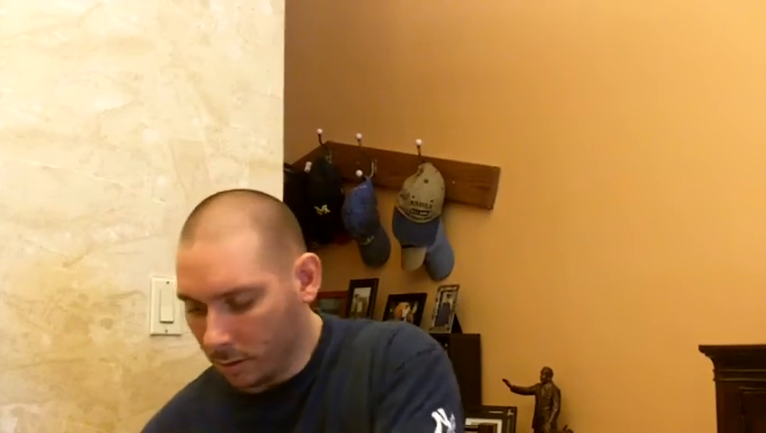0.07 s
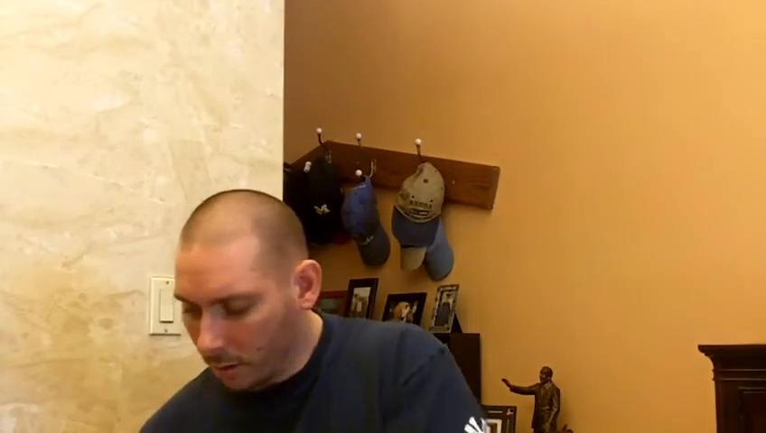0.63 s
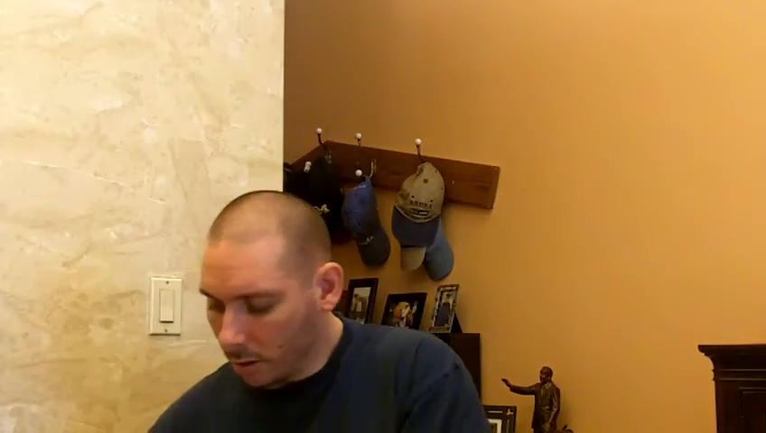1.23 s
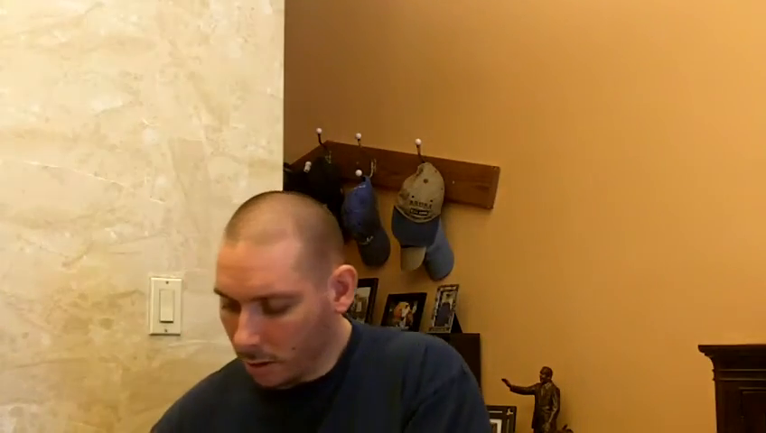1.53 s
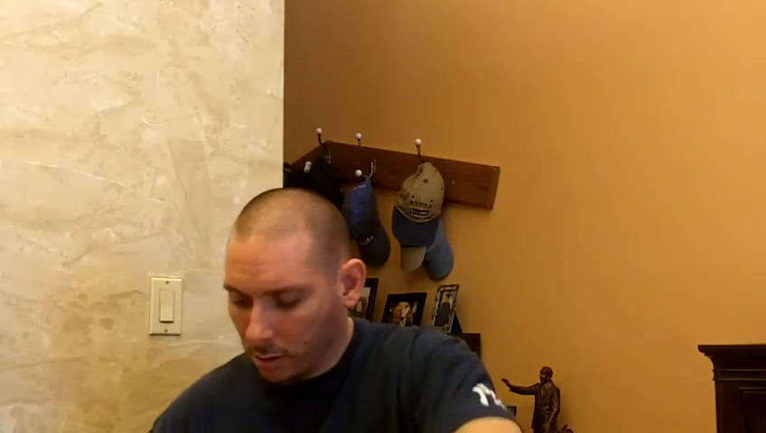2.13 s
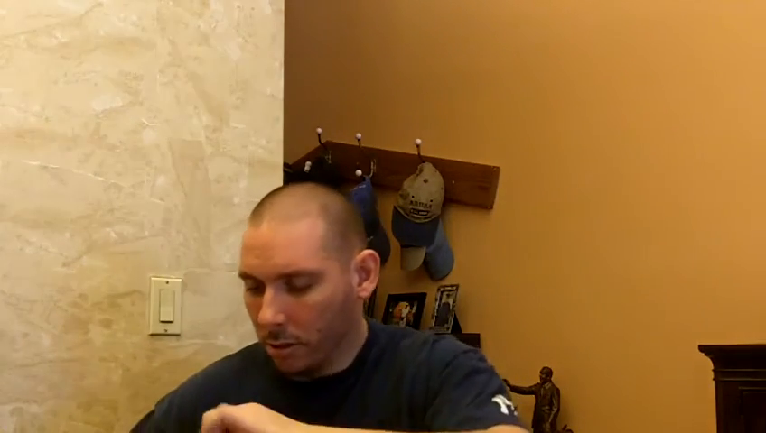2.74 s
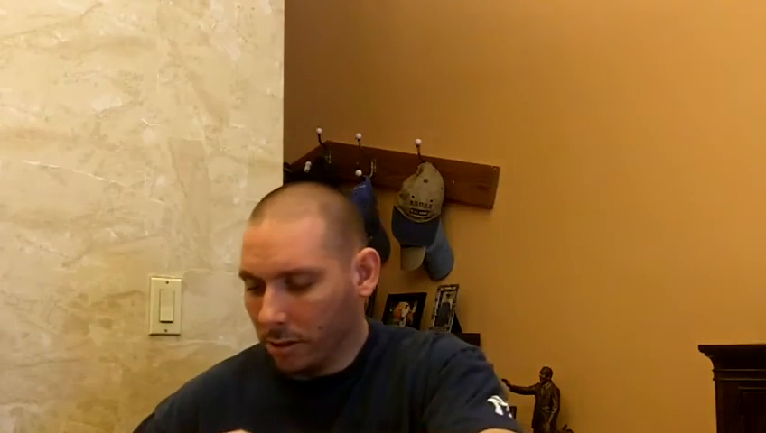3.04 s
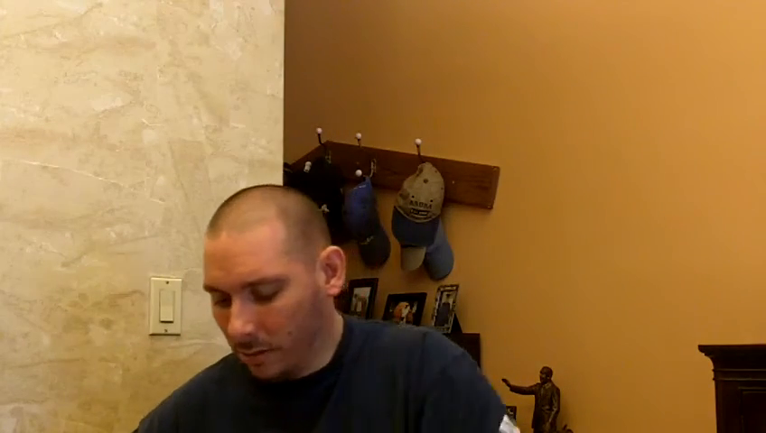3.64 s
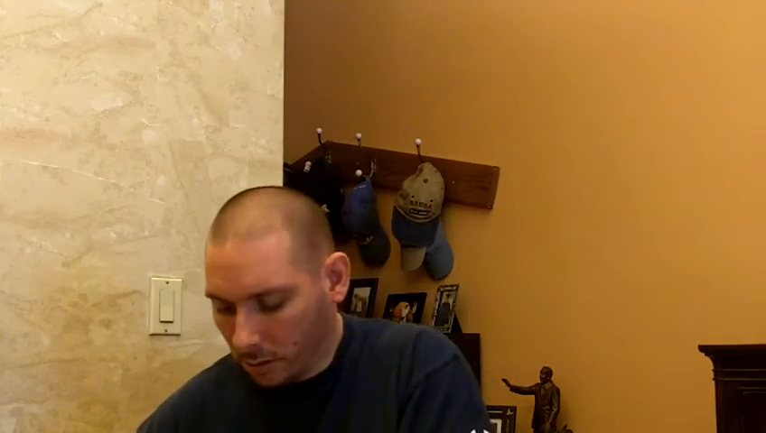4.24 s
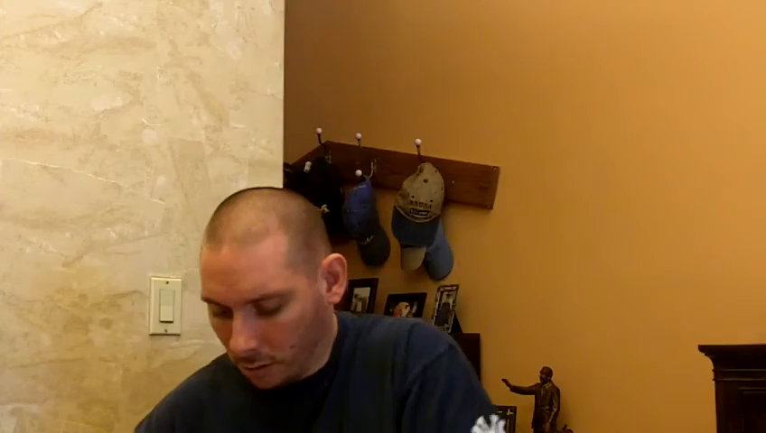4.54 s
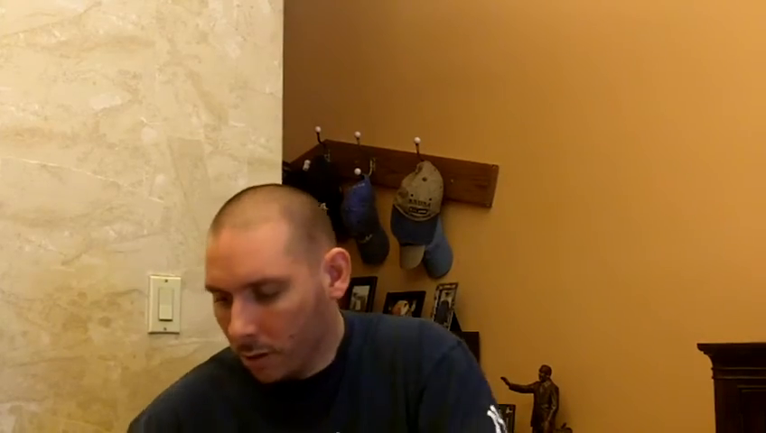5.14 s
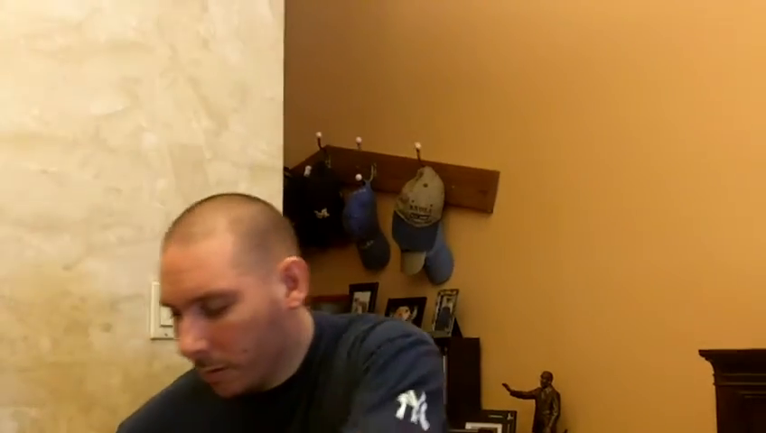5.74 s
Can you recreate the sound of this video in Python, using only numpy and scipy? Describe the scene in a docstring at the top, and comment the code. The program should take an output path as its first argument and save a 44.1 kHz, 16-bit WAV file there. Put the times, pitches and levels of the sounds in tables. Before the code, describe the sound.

A handgun is handled close to the microphone in a small, slightly echoing room, over faint rumble and hiss. It opens with a soft, dull bump and barely audible rubbing. From about 1.1 to 1.8 seconds a metal magazine gives a run of light taps, clinks and scrapes. A small click comes at 2.1 seconds, then a catch snaps sharply at 2.3. Light clicks around 3.2 seconds lead into the slide being racked: a hard clack at 3.4, a short scrape, and a brighter clack just after 3.5, with a brief steel ring. Quieter clicks and scrapes follow between 4.5 and 4.8 seconds, and a soft bump at 5.4. At about 5.7 seconds the gun is set down hard on a wooden table, the loudest sound, with a crack, a short boom and a smaller second knock.

```python
"""At a wooden table in a small room, handguns are handled close to a microphone.
A steel slide is racked back and forth, catches snap and a magazine taps and scrapes: each impact is a
short burst of force that excites the damped modes of the part struck. A gun set down hard cracks
against the tabletop, which booms. The room reverberates briefly, and gain control ducks the rumble,
hiss and whine of the background after the loud blows."""
import sys
import numpy as np
from scipy import signal
from scipy.fft import rfft, irfft
from scipy.io import wavfile
from scipy.ndimage import uniform_filter1d

SR = 44100
rng = np.random.default_rng(int(sys.argv[2]) if len(sys.argv) > 2 else 0)


def materialize(psi):
    """Save the field psi as 16-bit PCM at rate SR to the path in sys.argv[1].

    A 1-D psi becomes a single channel; in a 2-D psi each row is a channel.
    """
    bounded = np.clip(np.atleast_2d(psi).T, -1, 1)
    quanta = np.round(bounded * 32767).astype(np.int16)
    wavfile.write(sys.argv[1], SR, quanta)


N = 260190

# Steel on steel as the slide runs and stops. Each row: start in seconds, level in dB, treble in dB.
SLIDE_CLACKS = [(3.3628, -25.5, 7), (3.3685, -27.5, 1), (3.375, -19, 2.5), (3.3863, -7, -1.5),
                (3.390, -15.5, 2), (3.5167, -23, 1.5), (3.5341, -16.5, 4.5), (3.5398, -4, 13)]
# Steel meeting the tabletop. Each row: start in seconds, level in dB, treble in dB.
TABLE_BLOWS = [(4.724, -38, 15), (5.432, -33.5, -1), (5.7231, 6.5, 2), (5.812, -9.5, 5)]


def slide(rattle_t60_s=.019):
    """Impact excitation: the slide clacks on its stops; harder blows are fuller and ring more."""
    # Each row: frequency in Hz, spectral level of a clack in dB.
    spectrum = [(100, -24.5), (250, -21), (500, -11), (700, -8), (950, -11.5), (1300, -6.5), (2000, 1),
                (2900, 0), (3700, 3.5), (4400, -0.5), (7200, -3.5), (10300, -10), (12000, -24),
                (16000, -33.5)]
    # Each row: mode frequency in Hz, level in dB, t60 in seconds.
    steel_modes = [(1600, -12, .15), (2080, -6, .15), (2622, -13, .5), (4719, -3, .48), (4762, -2, .47),
                   (4815, -2, .48), (4890, -4, .42), (6228, -13, .4), (6794, -12, .3), (7531, -11, .2),
                   (9044, -5, .27), (10060, -4, .21), (10400, -1, .3), (11060, -10, .17)]
    clacks = [(s, db, 5.5 + .55 * db, treble_db, rattle_t60_s) for s, db, treble_db in SLIDE_CLACKS]
    out = contacts(clacks, spectrum, tick=3.4, press_s=.0018)
    steel = ring(steel_modes)
    for s, db, _ in SLIDE_CLACKS:
        ring_db = -20.5 + .7 * db  # relative to the clack
        add(out, s, amp(db + ring_db) * steel)
    return out


def frame_thump():
    """Momentum transfer: each stop of the slide jolts the frame, whose modes the hand damps."""
    # Each row: mode frequency in Hz, level in dB, t60 in seconds.
    frame_modes = [(320, -16.5, 0.0099), (526.7, -15, 0.0082)]
    out, thump = np.zeros(N), ring(frame_modes)
    for s, db, _ in SLIDE_CLACKS:
        add(out, s, amp(db) ** 2 * thump)  # only the hard stops move the whole frame
    return out


def slide_squeak(start_s=3.5298, hz=7293, rise_s=.007, t60_s=.022):
    """Stick-slip friction: the slide squeaks once just before it closes."""
    out, t = np.zeros(N), np.arange(SR // 20) / SR
    envelope = amp(1.5) * (1 - fade(t, rise_s)) * fade(t, t60_s)
    add(out, start_s, envelope * np.sin(2 * np.pi * hz * t))
    return out


def table_cracks(gain_db=-14.5, body_db=-5, rattle_t60_s=.018):
    """A brief contact has a broad spectrum: steel cracks against the tabletop at each blow."""
    # Each row: frequency in Hz, spectral level in dB.
    spectrum = [(60, -12), (250, 11), (650, -3), (1050, 4.5), (1600, -3), (2500, -5), (4000, -7.5),
                (6000, -17), (8500, -20), (12000, -33.5), (16000, -27)]
    cracks = [(s, db + gain_db, body_db, treble_db, rattle_t60_s) for s, db, treble_db in TABLE_BLOWS]
    return contacts(cracks, spectrum, tick=3.5, press_s=.00027)


def tabletop(rise_s=.052, lag_s=.002014):
    """Plate vibration: the wood swings up and booms after each crack, and rumbles under the arms."""
    # Forearms shifting. Each row: peak time in seconds, length in seconds, level in dB.
    leans = [(4.74, 0.11, -34), (5.46, 0.32, -39)]
    # Each row: frequency in Hz, spectral level in dB.
    lean_spectrum = [(15, -18), (30, 13.5), (70, -6.5), (92, -14.5), (108, 12), (128, -13), (160, -13),
                     (250, -36), (500, -25.5), (2000, -35.5), (6000, -52), (16000, -56)]
    # Each row: mode frequency in Hz, level in dB, t60 in seconds.
    wood_modes = [(109.4, -15.5, 0.5), (128.2, -9.5, 0.18), (236.7, -20.5, 0.35), (267, 1, 0.067),
                  (230, -23, 0.5), (291.8, -29, 0.43), (320, 9, 0.031), (358, -42, 0.17), (478, -24, 0.17),
                  (960, -25, 0.28), (1108, -27, 0.29)]
    out = friction(leans, lean_spectrum, swell=.27, grain_db=.5)
    boom = ring(wood_modes) * (1 - fade(np.arange(SR) / SR, rise_s))
    for s, db, _ in TABLE_BLOWS:
        add(out, s + lag_s, amp(db) * boom)
    return out


def catches(light_t60_s=.033, seated_db=-16, ring_db=-14.5, grip_damping=.75):
    """Damped impact: catches and levers snap and ring; the harder one seats, the less it rattles."""
    # Each row: start in seconds, level in dB, grip in dB, treble in dB.
    snaps = [(2.1408, -29.5, 2, -2.5), (2.176, -43, 20.5, -12.5), (2.2605, -41.5, -1, -5),
             (2.2651, -11.5, 0, 1), (2.47, -36.5, 23, -11), (3.1116, -52, -1, -8.5),
             (3.1921, -27.5, 1.5, -5.5), (3.2468, -29.5, 1.5, -9.5), (3.946, -57.5, -3, 2),
             (4.529, -27, 27.5, 5)]
    # Each row: frequency in Hz, spectral level in dB.
    spectrum = [(100, -23.5), (400, -28), (750, -14.5), (1100, -17), (1450, -12.5), (1700, -10.5),
                (2700, -4), (3050, -11.5), (3500, -1), (4400, -4), (6700, -4), (8300, -6.5), (11000, -20.5),
                (15000, -26)]
    # Each row: mode frequency in Hz, level in dB, t60 in seconds.
    latch_modes = [(1440, -8.5, .05), (2035, -8.5, .06), (2605, -0.5, 0.032), (3485, 3.5, 0.02),
                   (3620, 2, 0.12), (4730, -5, 0.034), (6480, -0.5, .035)]
    hits = [(s, db, grip_db, treble_db, light_t60_s / (1 + amp(db - seated_db)))
            for s, db, grip_db, treble_db in snaps]
    out = contacts(hits, spectrum, tick=7.0, press_s=.0013)
    latch = ring(latch_modes)
    for s, db, grip_db, _ in snaps:
        add(out, s, amp(db + ring_db - grip_damping * grip_db) * latch)
    return out


def magazine(rattle_t60_s=.017, clink_db=.5, grip_damping=.75):
    """Shell resonance: a tap clinks at a pitch set by where it lands; a firm grip weakens the ring."""
    # Each row: start in seconds, level in dB, grip in dB, treble in dB, clink pitch in Hz.
    taps = [(1.132, -38, 0, -13.5, 2113), (1.228, -43, -2, -9, 2040), (1.2841, -31, -2.5, 14, 1954),
            (1.344, -38, 7, -14, 2023), (1.4877, -31.5, 6.5, -21.5, 2413), (1.5421, -32.5, 14, -19.5, 2675),
            (1.5807, -30, 5.5, -7, 2190), (1.7347, -37, 8, 1.5, 3275), (1.746, -31, 17.5, -4, 3190),
            (4.7205, -39, 3.5, -3, 2184), (4.726, -42, -1, 6, 2150), (4.749, -42, 6, 10, 2390)]
    # Each row: frequency in Hz, spectral level in dB.
    spectrum = [(100, -18.5), (300, -19.5), (430, 0.5), (800, -8), (1300, -1), (2200, 7.5), (3000, -2.5),
                (4400, 5.5), (6000, -1), (8000, -1.5), (10500, -13.5), (12000, -27.5), (16000, -38)]
    # Each row: multiple of the clink pitch, level in dB, t60 in seconds.
    shell_modes = [(.6, -23, .04), (.86, -17.5, .045), (.93, -5.5, 0.042), (1, 4.5, 0.041),
                   (1.11, 0.5, 0.03)]
    hits = [(s, db, grip_db, treble_db, rattle_t60_s) for s, db, grip_db, treble_db, _ in taps]
    out = contacts(hits, spectrum, tick=1.2, press_s=.0021)
    for s, db, grip_db, _, hz in taps:
        clink = ring([(ratio * hz, mode_db, t60) for ratio, mode_db, t60 in shell_modes])
        add(out, s, amp(db + clink_db - grip_damping * grip_db) * clink)
    return out


def scrapes():
    """Sliding friction: metal rubs over metal and skin."""
    # Each row: peak time in seconds, length in seconds, level in dB.
    movements = [(.07, 0.23, -66), (.27, 0.077, -64.5), (.67, 0.08, -67.5), (.8, 0.15, -67.5),
                 (1.275, 0.08, -55), (1.7, 0.11, -48.5), (2.468, 0.058, -50), (3.383, 0.02, -21),
                 (3.44, .22, -41), (3.532, .04, -23.5), (4.58, 0.12, -44.5), (4.725, 0.13, -46),
                 (5.63, 0.21, -63.5)]
    # Each row: frequency in Hz, spectral level in dB.
    spectrum = [(100, -12), (800, -3.5), (2200, 3), (3500, -0.5), (5000, 0), (7500, -4), (9500, -10.5),
                (12000, -22.5), (16000, -31.5)]
    return friction(movements, spectrum, swell=.6, grain_db=2.0)


def bumps(treble_db=-6, rattle_t60_s=.025):
    """Cushioned impact: something padded bumps dully, with little treble."""
    # Each row: start in seconds, level in dB, body in dB.
    knocks = [(.032, -32, -18), (0.048, -30.5, 1), (.106, -45.5, 13)]
    # Each row: frequency in Hz, spectral level in dB.
    spectrum = [(130, -8), (290, 0), (420, -6), (650, -13), (1050, -9), (1700, -31.5), (3000, -52),
                (7000, -46), (16000, -64)]
    hits = [(s, db, body_db, treble_db, rattle_t60_s) for s, db, body_db in knocks]
    return contacts(hits, spectrum, tick=7.6, press_s=.0012)


def reflections(gap_s=.001, build_s=.006):
    """Absorption varies with frequency: sparse echoes die away at a different rate in each band."""
    # Each row: frequency in Hz, reverberation time in seconds.
    decay_times = [(100, 0.43), (400, 0.41), (1500, 0.51), (4000, 0.48), (8000, 0.4), (14000, 0.18)]
    # Each row: frequency in Hz, level of the reverberation in dB.
    spectrum = [(100, -2.5), (500, 1.5), (2000, -1.5), (7000, -3.5), (11000, -5.5), (15000, -14)]
    echoes = np.zeros(SR)
    slots = np.arange(0, SR - 10, 10)
    echoes[slots + rng.integers(0, 10, len(slots))] = rng.choice([-1., 1.], len(slots))
    hz, t, bands = signal.stft(echoes, SR, nperseg=256)
    t60 = curve(decay_times, hz)[:, None]
    energy = SR / 10 * t60 / (2 * np.log(1000))
    bands = bands * fade(t, t60) * amp(curve(spectrum, hz))[:, None] / np.sqrt(energy)
    tail = signal.istft(bands, SR, nperseg=256)[1]
    return tail * np.clip((np.arange(len(tail)) / SR - gap_s) / build_s, 0, 1)


def room(x, patterns=3, cycle_s=.7):
    """Reverberation: echo patterns crossfade in a steady cycle, so successive tails differ in colour."""
    phase = 2 * np.pi * np.arange(N) / SR / cycle_s
    paths = (x * np.cos(phase + np.pi * k / patterns) for k in range(patterns))
    return np.sqrt(2 / patterns) * sum(signal.fftconvolve(path, reflections())[:N] for path in paths)


def background(air_db=-49.5, hiss_edge_hz=12800, throb_hz=30.2, waver_hz=12):
    """The noise floor: room rumble, microphone hiss and a thin, amplitude-modulated electrical whine."""
    # Each row: frequency in Hz, spectral level in dB.
    air_spectrum = [(5, -14.5), (12, -14.5), (17, 5.5), (25, -12.5), (60, -14), (90, -20), (112, -11),
                    (140, -24), (220, -24), (500, -35.5), (900, -36), (2000, -46), (6000, -53),
                    (12500, -55)]
    # Each row: frequency in Hz, level in dB.
    whine_tones = [(4070, -79), (3420, -85)]
    t = np.arange(N) / SR
    air = noise(lambda f: curve(air_spectrum, f) - 20 * np.clip((f - hiss_edge_hz) / 300, 0, 1))
    throb = unit_rms(np.maximum(np.sin(2 * np.pi * throb_hz * t) + .4, 0))
    waver = waver_hz * unit_rms(uniform_filter1d(rng.standard_normal(N), size=900))
    whine = sum(amp(db) * unit_rms(np.sin(2 * np.pi * np.cumsum(hz + waver) / SR))
                for hz, db in whine_tones)
    return amp(air_db) * air + throb * whine


def contacts(hits, spectrum, tick, press_s, body_hz=760, body_octaves=.96, treble_hz=5500):
    """Source and filter: a tick and a dying rattle, coloured by a hollow body and a treble shelf."""
    out, t = np.zeros(N), np.arange(SR // 10) / SR
    for s, db, body_db, treble_db, t60 in hits:
        force = rng.standard_normal(len(t)) * fade(t, t60) * (1 - fade(t, press_s))
        force[0] = tick
        response = minimum_phase(lambda f: curve(spectrum, f)
                                 + body_db / (1 + (np.log2((f + 1) / body_hz) / body_octaves) ** 2)
                                 + treble_db / (1 + (treble_hz / (f + 1)) ** 4))
        click = signal.fftconvolve(force, response)
        click /= np.sqrt(np.sum(click ** 2) / (.003 * SR))  # the energy of 3 ms at unit rms
        add(out, s, amp(db) * click)
    return out


def friction(movements, spectrum, swell, grain_db):
    """Friction noise follows pressure, which builds for the share `swell` of a movement, then falls."""
    t = np.arange(N) / SR
    pressure = sum(amp(db) * np.interp((t - peak) / length, [-swell, 0, 1 - swell], [0, 1, 0])
                   for peak, length, db in movements)
    roughness = unit_rms(uniform_filter1d(rng.standard_normal(N), size=90))
    grains = unit_rms(amp(grain_db * roughness))
    return pressure * grains * noise(lambda f: curve(spectrum, f))


def ring(modes):
    """Modal superposition: a struck object sounds as a sum of decaying sines."""
    t = np.arange(SR) / SR
    return sum(amp(db) * fade(t, t60) * np.sin(2 * np.pi * hz * t) for hz, db, t60 in modes)


def noise(db_at):
    """Spectral shaping: steady noise of unit rms whose spectrum follows db_at(Hz)."""
    white = rfft(rng.standard_normal(N))
    return unit_rms(irfft(white * amp(db_at(np.fft.rfftfreq(N, 1 / SR))), N))


def minimum_phase(db_at, size=2048):
    """Minimum phase gives the sharpest causal click whose spectrum follows db_at(Hz)."""
    log_gain = np.log(amp(db_at(abs(np.fft.fftfreq(size, 1 / SR)))))
    return np.fft.ifft(np.exp(np.conj(signal.hilbert(log_gain)))).real


def fade(t, t60):
    """Exponential decay by 60 dB in t60 seconds."""
    return np.exp(-np.log(1000) * t / np.maximum(t60, 1e-4))


def curve(points, hz):
    """Linear interpolation on a log-frequency axis."""
    f, value = np.transpose(points)
    return np.interp(np.log(hz + 1), np.log(f + 1), value)


def amp(db):
    """Decibels to amplitude ratio."""
    return 10 ** (np.asarray(db) / 20)


def unit_rms(x):
    """Normalisation to an rms of 1."""
    return x / np.sqrt(np.mean(x ** 2) + 1e-20)


def add(mix, start_s, sound):
    """Superposition: a sound joins the mix at start_s."""
    part = mix[round(start_s * SR):][:len(sound)]
    part += sound[:len(part)]


def scene():
    """Direct and reverberant fields sum at one microphone, which feeds both channels."""
    sources = [  # Each row: sound, level sent to the room in dB.
        (magazine(), .3),
        (catches(), -1.5),
        (slide(), -1.5),
        (table_cracks(), 4),
        (bumps(), 2.5),
        (scrapes(), .1),
        (slide_squeak(), -10),
        (frame_thump(), -12),
        (tabletop(), -3)]
    direct = sum(sound for sound, _ in sources)
    sent = sum(amp(wet_db) * sound for sound, wet_db in sources)
    return np.tile(direct + room(sent) + background(), (2, 1))


def record(dry, notch_hz=5450, notch_width_hz=230, notch_db=-17, edge_hz=16100,
           threshold_db=-27, squeeze=.48, recover_db_per_s=11, attack_s=.011):
    """Dynamic compression: after the microphone's notch, gain control, clipping and a band limit."""
    # Each row: one channel's steady offset as a fraction of full scale.
    dc_offset = [
        [.004],
        [-.023],
    ]
    notch = minimum_phase(lambda f: notch_db / (1 + ((f - notch_hz) / notch_width_hz) ** 2))
    x = signal.fftconvolve(dry, notch[None], axes=1)[:, :N]
    pole = np.exp(-1 / (attack_s * SR))
    power_db = 10 * np.log10(signal.lfilter([1 - pole], [1, -pole], x[0] ** 2) + 1e-12)
    fall_db = np.arange(N) * recover_db_per_s / SR
    held_db = np.maximum.accumulate(power_db + fall_db) - fall_db  # each peak is released slowly
    over_db = np.maximum(held_db - threshold_db, 0)
    duck_db = squeeze * signal.lfilter([1 - pole], [1, -pole], over_db)
    x = np.clip(x / amp(duck_db), -1, 1)
    lowpass = signal.firwin(255, edge_hz, window=("kaiser", 9), fs=SR)
    return signal.oaconvolve(x, lowpass[None], "same") + dc_offset


dry = scene()
out = record(dry)
materialize(out)
```